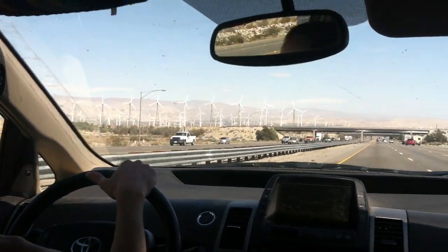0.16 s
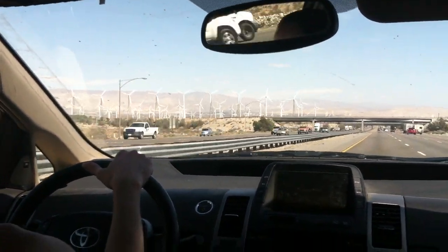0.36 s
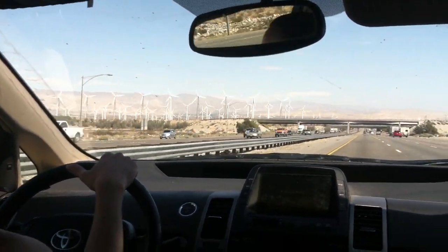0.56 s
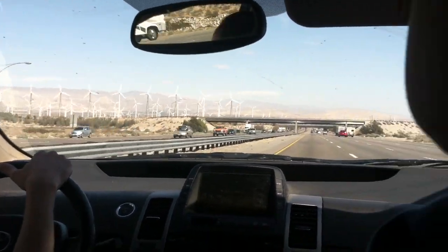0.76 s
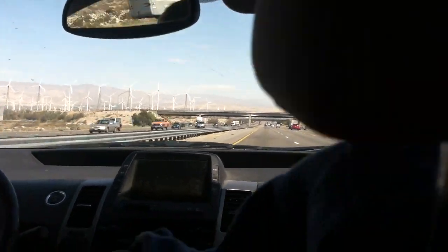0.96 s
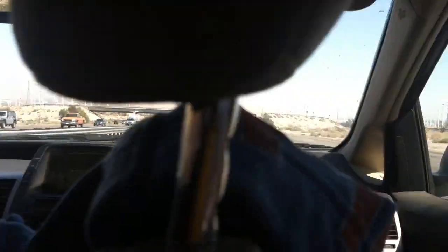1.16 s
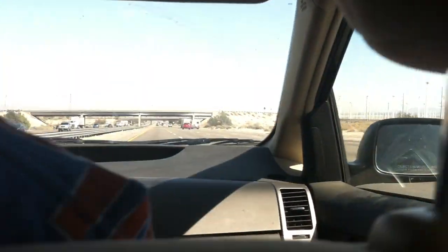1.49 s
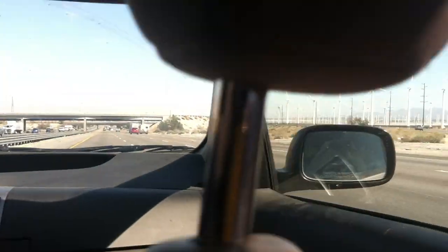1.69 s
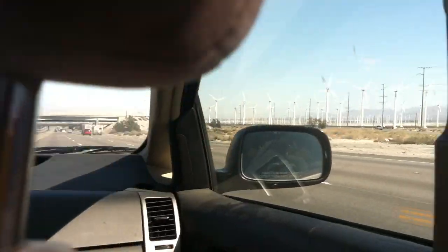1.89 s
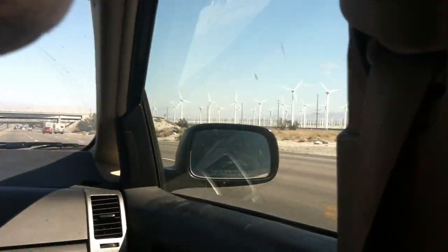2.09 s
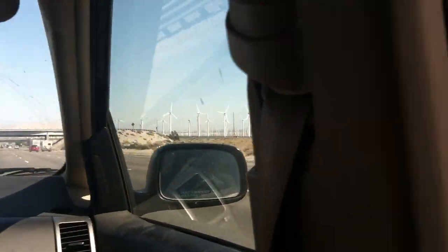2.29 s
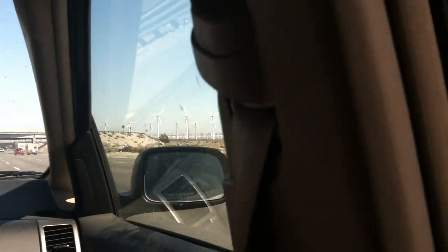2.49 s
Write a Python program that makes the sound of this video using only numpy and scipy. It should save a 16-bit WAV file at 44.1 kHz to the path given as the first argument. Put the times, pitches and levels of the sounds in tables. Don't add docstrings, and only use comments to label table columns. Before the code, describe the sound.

Steady low rumble inside a moving car on a highway, with dull seam thuds near the end

```python
import sys
import numpy as np
from scipy import signal
from scipy.fft import rfft, irfft, next_fast_len
from scipy.io import wavfile
from scipy.ndimage import uniform_filter1d, map_coordinates

SR = 44100
rng = np.random.default_rng(int(sys.argv[2]) if len(sys.argv) > 2 else 0)


def master_out(mix):
    frames = np.transpose(np.atleast_2d(mix))
    ceiling = np.clip(frames, -1, 1)
    pcm = np.round(ceiling * 32767).astype(np.int16)
    wavfile.write(sys.argv[1], SR, pcm)


def convert_level_to_amplitude(level_db):
    exponent = np.asarray(level_db, float) / 20
    return 10 ** exponent


N = 116865
T = np.arange(N) / SR


def unit(x):
    return x / np.sqrt(np.mean(x ** 2) + 1e-20)


def along(points, hz):
    f, db = np.transpose(points)
    return convert_level_to_amplitude(np.interp(np.log(hz + 1), np.log(f + 1), db, left=-120, right=-120))


def curve(rows):
    s, value = np.transpose(rows)
    return np.interp(T, s, value)


def wobble(rate):
    return map_coordinates(rng.standard_normal(400), [np.arange(N) * rate / SR])


def bell(s, length):
    return np.exp(-(2 * (T - s) / length) ** 2)


def peak(f, hz, width_hz):
    damping = 1j * f * width_hz
    return damping / (hz * hz - f * f + damping)


def filtered(x, response):
    m = next_fast_len(N + SR // 2)
    return irfft(rfft(x, m) * response(np.fft.rfftfreq(m, 1 / SR)), m)[:N]


def rush(response, patchy_db=0):
    z = signal.stft(rng.standard_normal(N), nperseg=512)[2]
    field = uniform_filter1d(rng.standard_normal(z.shape), size=5, axis=0)
    field = uniform_filter1d(field, size=14, axis=1)
    noise = signal.istft(z * convert_level_to_amplitude(patchy_db * unit(field)), nperseg=512)[1][:N]
    return unit(filtered(noise, response))


def drone(hz, width_hz):
    ring = signal.hilbert(rush(lambda f: peak(f, hz, width_hz) ** 2), next_fast_len(N))[:N]
    evened = (ring / (np.abs(ring) + 0.073) ** 0.65).real
    return unit(filtered(evened, lambda f: peak(f, hz, 2.5 * width_hz)))


# (time [s], facing [0 dashboard - 1 window])
TURN = [
    (0, 0),
    (.35, 0.1),
    (.9, .2),
    (1.4, 0.23),
    (1.8, 0.72),
    (2.15, 0.96),
    (2.3, 1.03),
    (2.65, 1.07),
]


def facing():
    return curve(TURN)


# (frequency [Hz], width [Hz], level [dB])
CABIN = [(96.6, 19, -8.5), (127.6, 14.6, 0), (168.1, 14.5, -2), (202.3, 33, -2), (261, 26, -8.5)]


def cabin_boom():
    return unit(sum(convert_level_to_amplitude(db) * drone(hz, width) for hz, width, db in CABIN))


# (frequency [Hz], level [dB per Hz])
PANELS = [(2, -37), (25, -46.5), (50, -29), (110, -6), (230, -5), (400, -9), (800, -18), (1750, -32),
          (3000, -50.5), (4200, -72)]


def panel_roar():
    return rush(lambda f: along(PANELS, f), patchy_db=0.61)


# (time [s], level [dB])
ROAD = [(0, -28.5), (.3, -37.5), (.6, -35), (.9, -33.5), (1.05, -33.5), (1.35, -33), (1.5, -30.5),
        (1.68, -30.5), (1.76, -30.5), (2.05, -31.5), (2.25, -30), (2.4, -32.5), (2.65, -31)]


def road():
    force_db, turn = curve(ROAD), facing()
    boom_db = force_db - 7 + 3 * turn
    panels_db = -32.5 + 0.24 * (force_db - force_db.mean()) - turn
    return convert_level_to_amplitude(boom_db) * cabin_boom() + convert_level_to_amplitude(panels_db) * panel_roar()


# (time [s], length [s], start frequency [Hz], end frequency [Hz], level [dB])
SWELLS = [(.1, .12, 180, 163, -39.5), (0.331, 0.16, 140, 136.3, -35.5), (.5, .12, 170, 175, -37),
          (0.662, .12, 210, 202, -39), (0.864, 0.13, 150, 199.6, -41), (1.02, 0.13, 150, 131, -35.5),
          (1.004, 0.18, 210, 178, -36.5), (1.15, 0.11, 120, 140, -41), (1.2, .16, 185, 150, -34.5),
          (1.504, 0.24, 140, 122, -36), (1.66, 0.088, 160, 190, -32), (1.7, .12, 200, 195, -37.5),
          (1.92, 0.2, 125, 132, -35), (2.08, 0.17, 155, 172, -32.5), (2.23, 0.11, 195, 170, -33),
          (1.9, .1, 135, 142, -38), (2.34, 0.081, 178, 160, -31.5), (2.5, 0.13, 170, 170, -35.5),
          (2.62, 0.09, 120, 160, -35.5), (2.7, 0.095, 300, 262, -35), (1.5, 0.16, 690, 715, -44.5),
          (1.76, 0.078, 735, 715, -44.5), (1.84, 0.14, 820, 650, -49), (2.06, 0.14, 780, 650, -44.5),
          (1.9, .12, 960, 780, -52), (1.52, .1, 600, 510, -40.5), (1.4, .08, 430, 500, -46),
          (2.3, .1, 730, 592, -46.5), (0.24, 0.12, 600, 620, -46), (.27, 0.14, 660, 800, -46),
          (1.254, 0.11, 540, 640, -47.5), (1.02, 0.092, 670, 690, -49), (0.398, 0.11, 610, 510, -45.5)]


def swells():
    waver = 1 + 0.015 * wobble(25)
    total = np.zeros(N)
    for s, length, start_hz, end_hz, db in SWELLS:
        hz = np.interp(T, [s - length / 2, s + length / 2], [start_hz, end_hz]) * waver
        tone = np.sin(2 * np.pi * np.cumsum(hz) / SR)
        total += convert_level_to_amplitude(db + 3.5) * bell(s, length) * tone
    return total


# (time [s], peak level [dB])
SEAMS = [
    (1.251, -26),
    (1.416, -19.5),
    (1.48, -19),
    (1.864, -28.5),
    (2.333, -23),
    (2.469, -26),
    (2.526, -12.5),
    (2.589, -15),
]


def seams():
    thud_hz, t60_s, cut_hz = 192, 0.022, 152
    kicks, t = np.zeros(N), np.arange(3000) / SR
    for s, db in SEAMS:
        kicks[round(s * SR)] = convert_level_to_amplitude(db)
    thud = np.sin(2 * np.pi * thud_hz * t) * t * convert_level_to_amplitude(-60 * t / t60_s)
    body = signal.fftconvolve(kicks, thud / np.abs(thud).max())[:N]
    return filtered(body, lambda f: (1j * f / (cut_hz + 1j * f)) ** 3)


# (time [s], length [s], frequency [Hz], width [Hz], level [dB])
HUMS = [
    (1.22, 0.39, 424, 141, -38.5),
    (1.47, 0.24, 515, 81, -46.5),
    (1.716, 0.37, 695, 64, -42.5),
    (1.81, 0.45, 696, 77, -50),
    (2.049, 0.24, 763, 139, -42),
    (2.398, 0.14, 808, 60, -49),
    (2.5, 0.35, 256, 48, -40),
    (1.6, 0.22, 77.8, 21, -47),
    (2.207, .2, 280, 75.6, -39),
    (2.25, 0.44, 176.7, 32.4, -38),
]


def tread():
    return sum(convert_level_to_amplitude(db) * bell(s, length) * drone(hz, width) for s, length, hz, width, db in HUMS)


# (frequency [Hz], level [dB per Hz])
DASH = [(500, -43), (800, 0.5), (1050, 4.5), (1400, -3), (2200, -39)]


def dash_roar():
    fade_s = 0.4
    return convert_level_to_amplitude(-47) * np.exp(-(T / fade_s) ** 4) * rush(lambda f: along(DASH, f))


# (time [s], peak level [dB])
TICKS = [(.104, -69), (.249, -79), (.325, -74), (.504, -70), (.523, -69), (.692, -80), (.77, -75),
         (.989, -73), (1.041, -74), (1.065, -67), (1.087, -69), (1.111, -73), (1.16, -72), (1.232, -75),
         (1.258, -65.5), (1.282, -76), (1.311, -69.5), (1.357, -73.5), (1.381, -74), (1.409, -68),
         (1.434, -71), (1.477, -73), (1.503, -73), (1.551, -73), (1.606, -68), (1.657, -69), (1.714, -74),
         (1.949, -71), (2.289, -68), (2.342, -68), (2.54, -74), (2.586, -67)]
# (frequency [Hz], level [dB per Hz])
TRIM = [(2500, -28.5), (4500, -8.5), (7000, -0.5), (10000, -7.5), (13500, -12.5), (14500, -18),
        (15600, -28.5)]


def trim():
    rattle_hz, rattle_db, scatter_db, jitter = 40.8, -80, 2, 0.06
    rise_s, t60_s, gain_db = 0.002, 0.026, 1
    kicks, t = np.zeros(N + SR), np.arange(2000) / SR
    chance = rng.standard_normal((120, 2))
    at = (np.arange(120) + 0.29 + jitter * chance[:, 0]) / rattle_hz
    np.add.at(kicks, np.clip(at * SR, 0, N).astype(int), convert_level_to_amplitude(rattle_db + scatter_db * chance[:, 1]))
    for s, db in TICKS:
        kicks[round(s * SR)] += convert_level_to_amplitude(db)
    shape = (1 - np.exp(-t / rise_s)) * convert_level_to_amplitude(-60 * t / t60_s)
    envelope = signal.fftconvolve(kicks, shape / shape.max())[:N]
    grit = np.sign(rng.standard_normal(N))
    colour = lambda x: filtered(x, lambda f: along(TRIM, f))
    return convert_level_to_amplitude(gain_db) * colour(envelope * grit) / colour(grit).std()


def ping():
    start_s, hz, peak_db, t60_s, rise_s = 0.103, 4350, -53, 0.05, 0.002
    t = np.clip(T - start_s, 0, None)
    return convert_level_to_amplitude(peak_db - 60 * t / t60_s) * (1 - np.exp(-t / rise_s)) * np.sin(2 * np.pi * hz * t)


# (time [s], level [dB])
WHINE = [(0, -62), (.15, -57), (.6, -59), (1.15, -68), (1.3, -55.5), (1.68, -54.5), (1.8, -66),
         (2.65, -62.5)]


def drive():
    hz, width_hz = 1750, 45
    return convert_level_to_amplitude(curve(WHINE) - 6) * rush(lambda f: peak(f, hz, width_hz) ** 2)


# (frequency [Hz], level [dB per Hz])
SEALS = [(1500, -44), (2600, -8.5), (3700, -1), (5100, -4), (6100, -9.5), (9000, -16), (13000, -30),
         (15600, -32)]


def wind():
    turn = facing()
    hiss_db = -64 - 2.5 * turn + 0.33 * wobble(5.4)
    hiss = convert_level_to_amplitude(hiss_db) * rush(lambda f: along(SEALS, f), patchy_db=0.8)
    leak_hz, leak_width_hz = 3460, 1870
    leak_db = -63.6 + 24 * (turn - 1)
    leak = convert_level_to_amplitude(leak_db) * rush(lambda f: peak(f, leak_hz, leak_width_hz) ** 2)
    return hiss + leak


def scene():
    vehicle = road() + swells() + seams() + tread() + dash_roar()
    return (vehicle + trim() + ping() + drive() + wind())[None]


def top_cut(x):
    return signal.sosfilt(signal.butter(12, 15612, fs=SR, output="sos"), x)


def record(dry):
    remaining_s = np.arange(N)[::-1] / SR
    closing = np.sin(np.pi / 2 * np.clip(remaining_s / 0.003, 0, 1)) ** 2
    return top_cut(dry * closing)


dry = scene()
out = record(dry)
master_out(out)
```